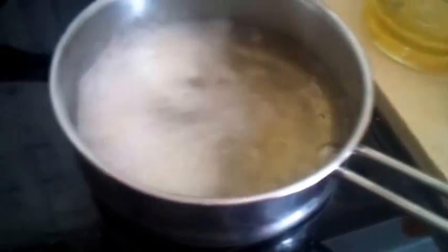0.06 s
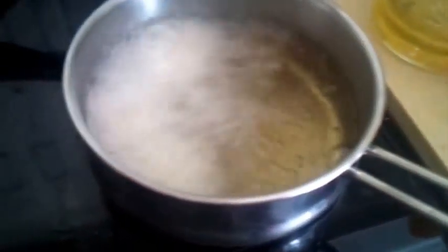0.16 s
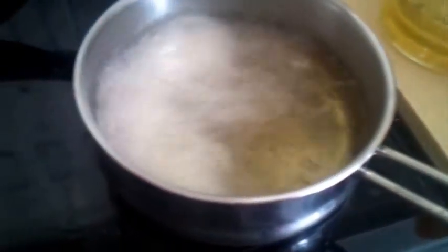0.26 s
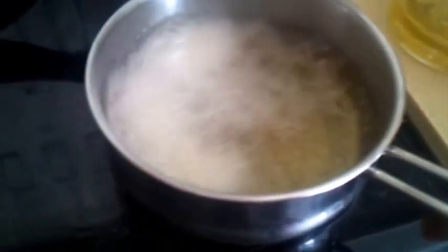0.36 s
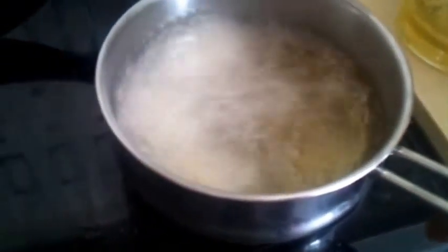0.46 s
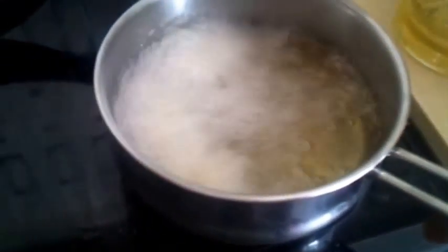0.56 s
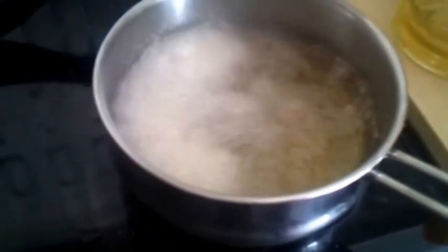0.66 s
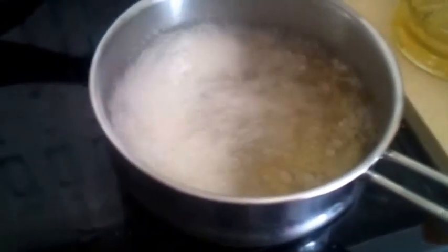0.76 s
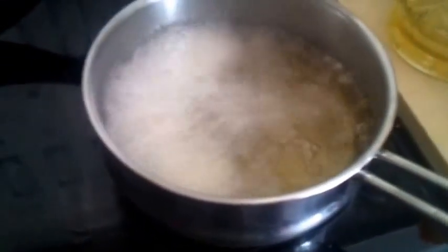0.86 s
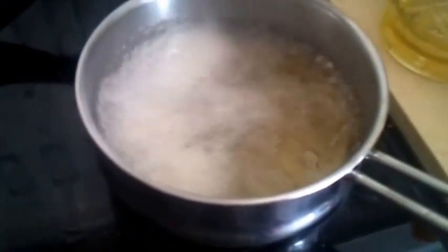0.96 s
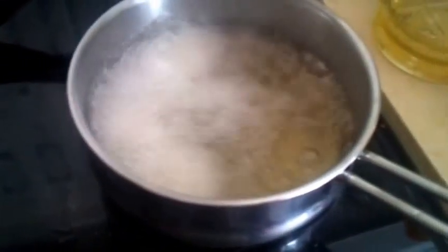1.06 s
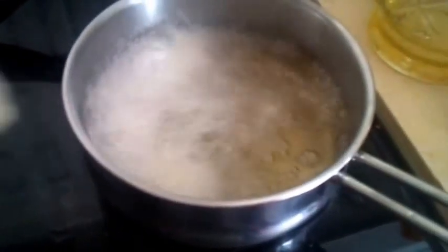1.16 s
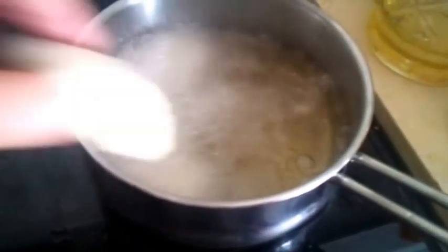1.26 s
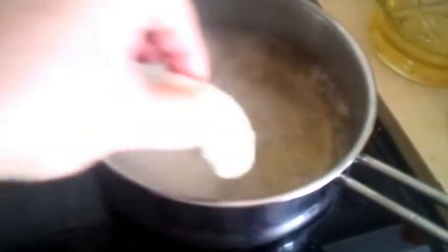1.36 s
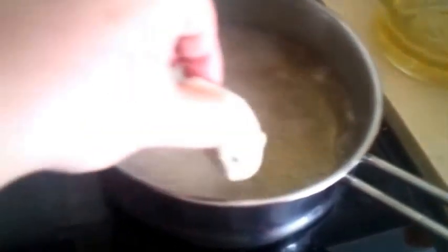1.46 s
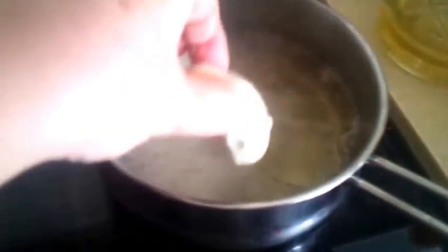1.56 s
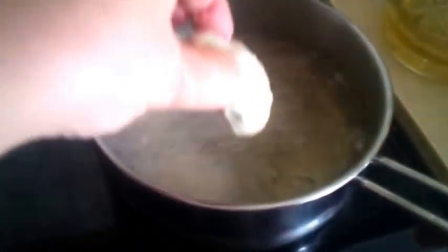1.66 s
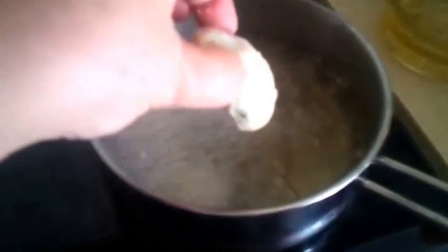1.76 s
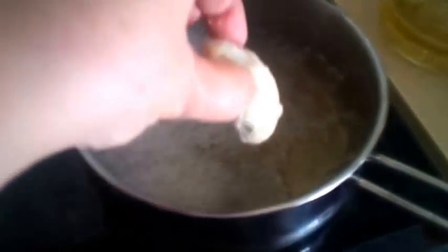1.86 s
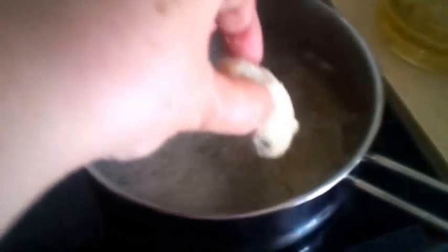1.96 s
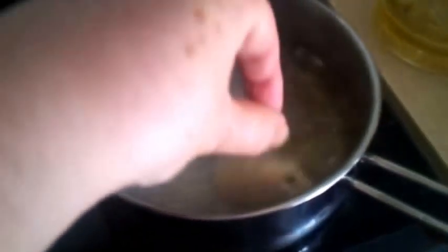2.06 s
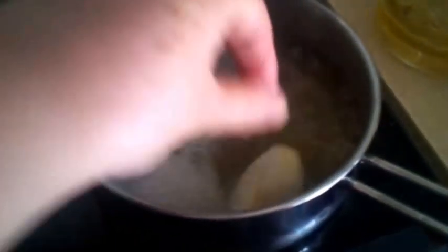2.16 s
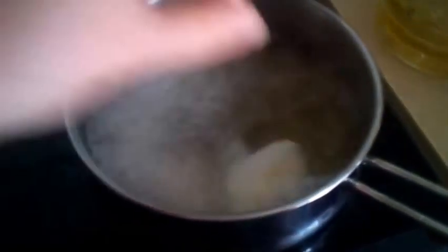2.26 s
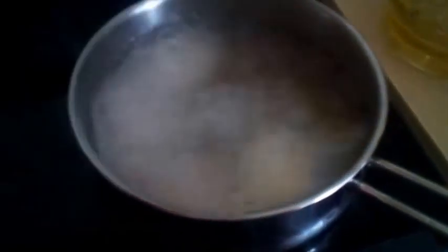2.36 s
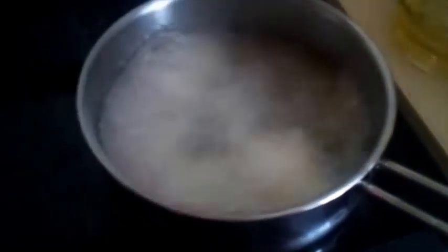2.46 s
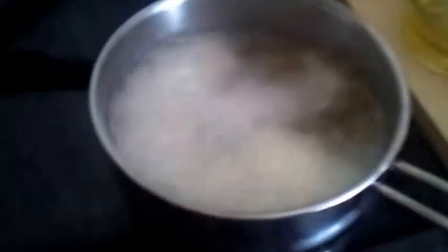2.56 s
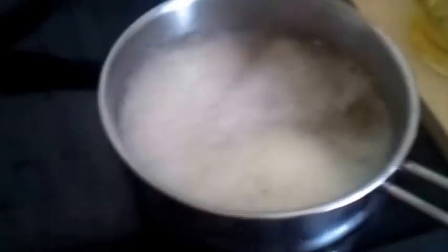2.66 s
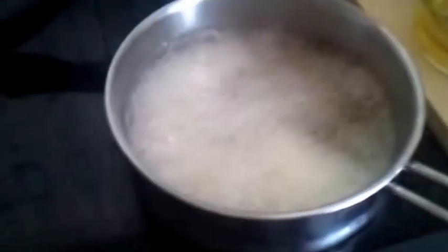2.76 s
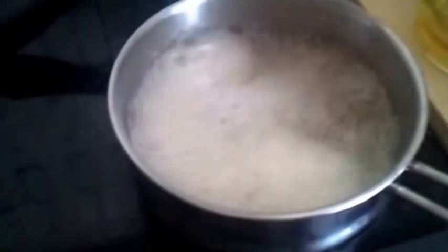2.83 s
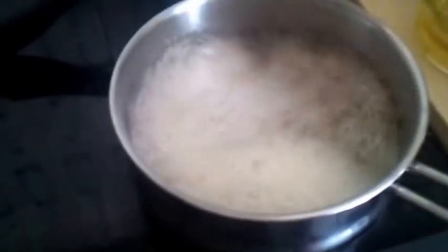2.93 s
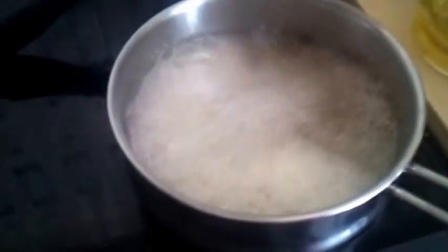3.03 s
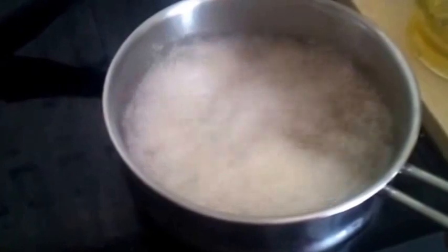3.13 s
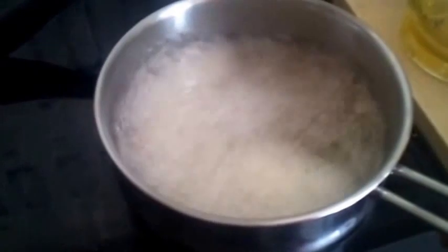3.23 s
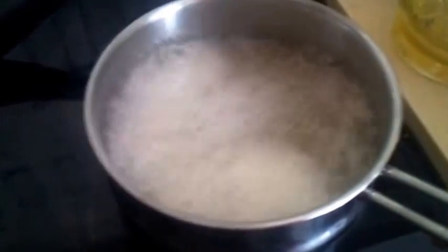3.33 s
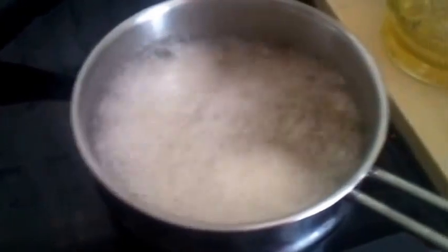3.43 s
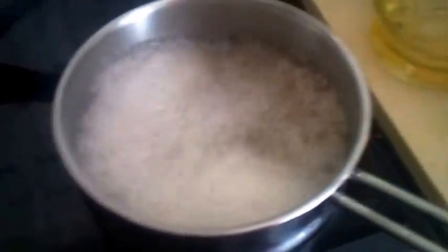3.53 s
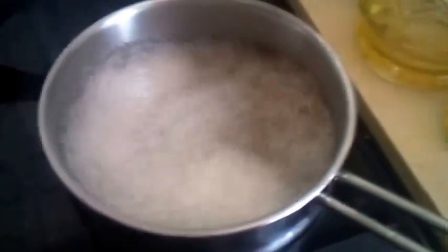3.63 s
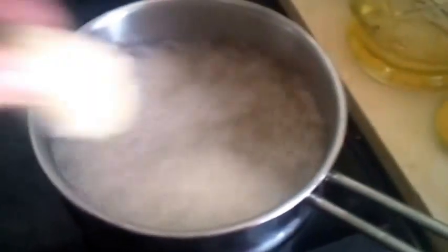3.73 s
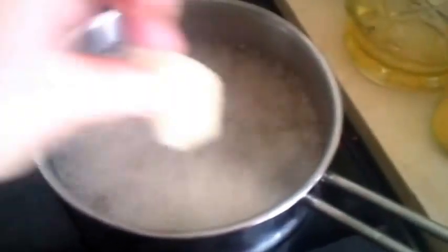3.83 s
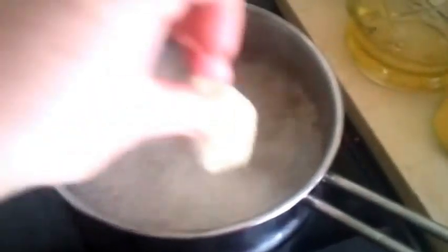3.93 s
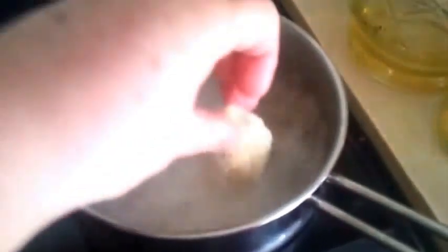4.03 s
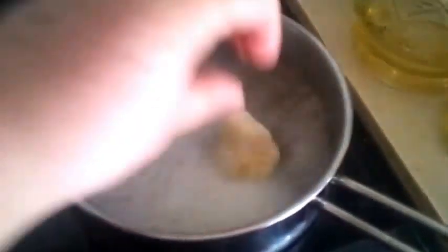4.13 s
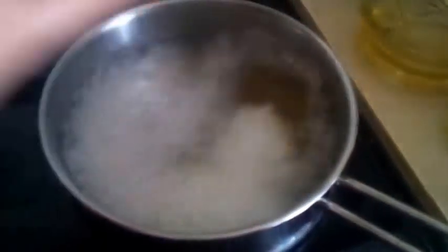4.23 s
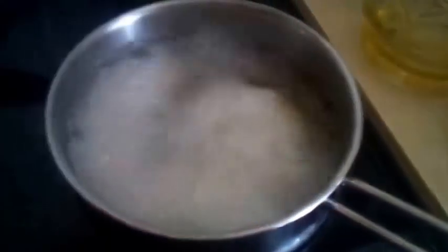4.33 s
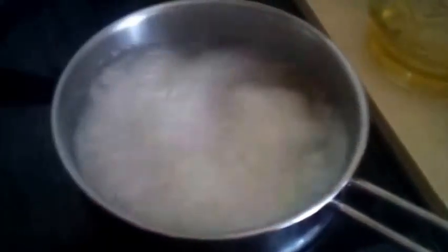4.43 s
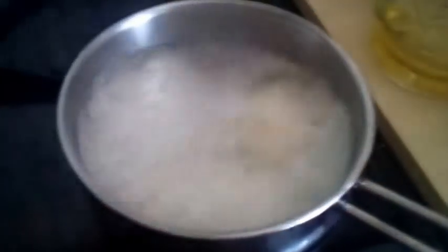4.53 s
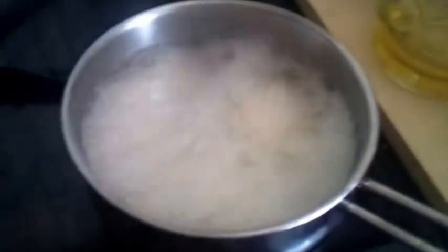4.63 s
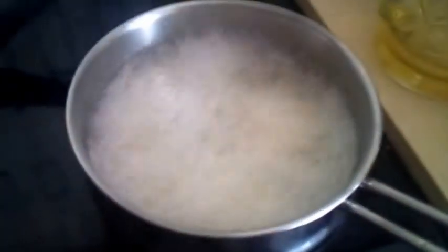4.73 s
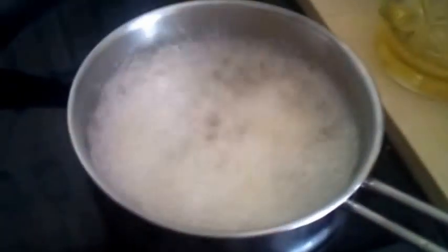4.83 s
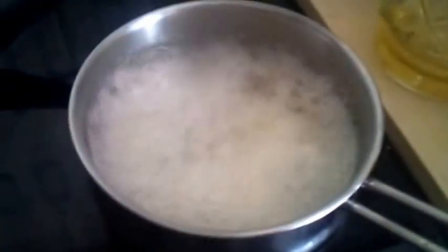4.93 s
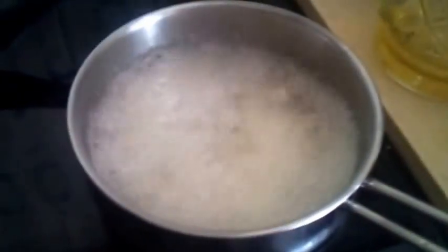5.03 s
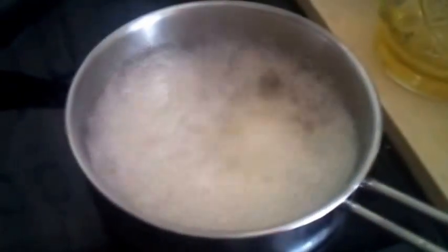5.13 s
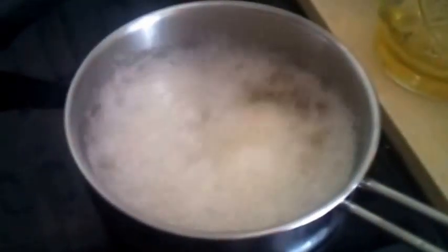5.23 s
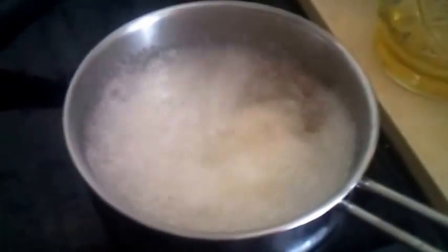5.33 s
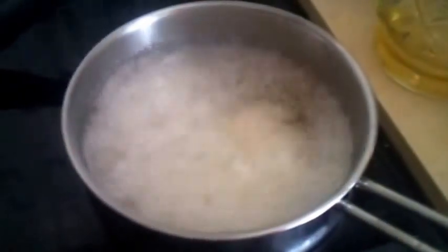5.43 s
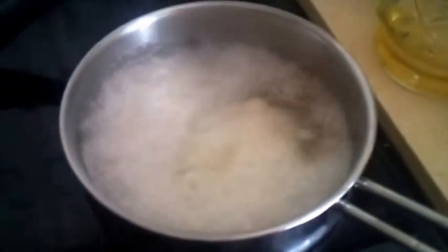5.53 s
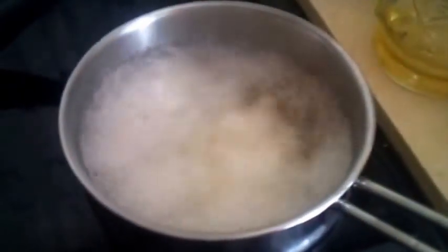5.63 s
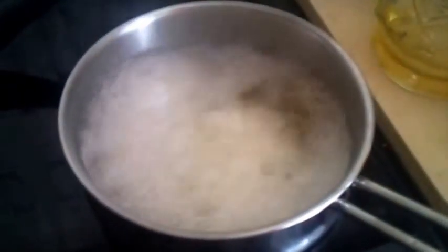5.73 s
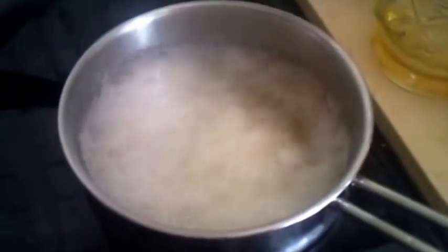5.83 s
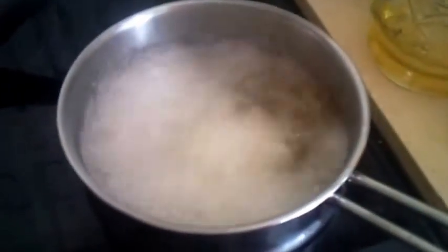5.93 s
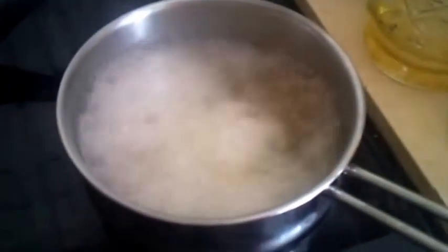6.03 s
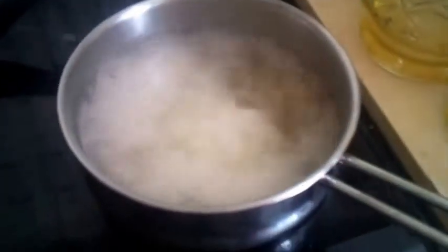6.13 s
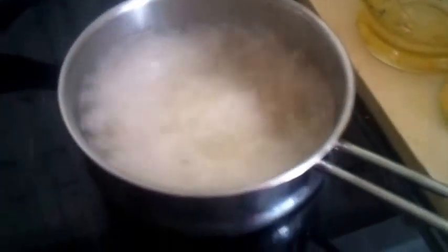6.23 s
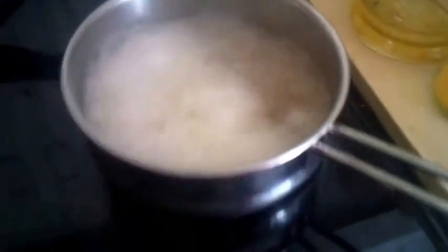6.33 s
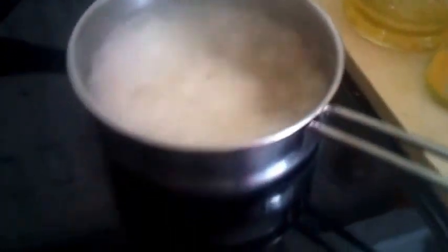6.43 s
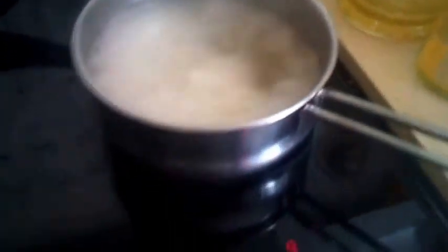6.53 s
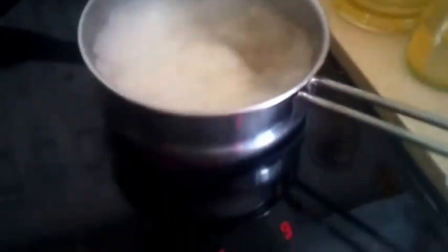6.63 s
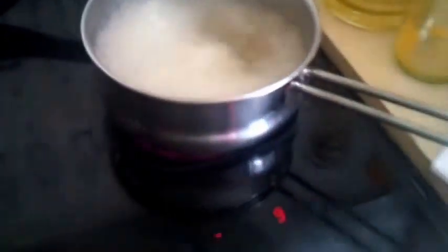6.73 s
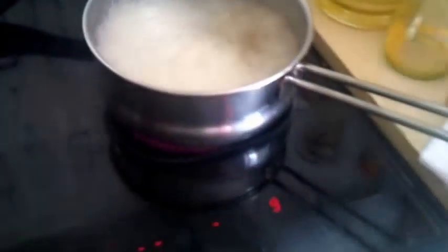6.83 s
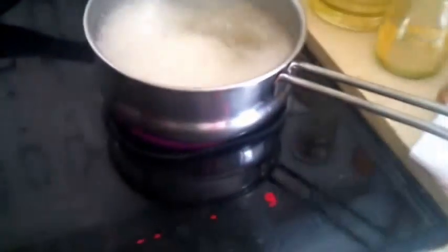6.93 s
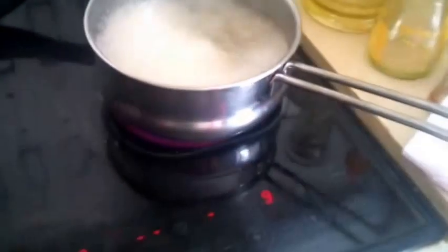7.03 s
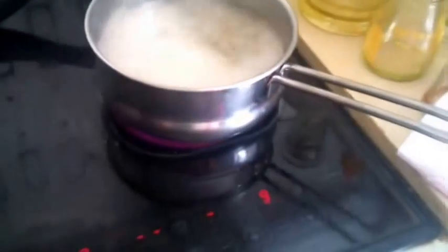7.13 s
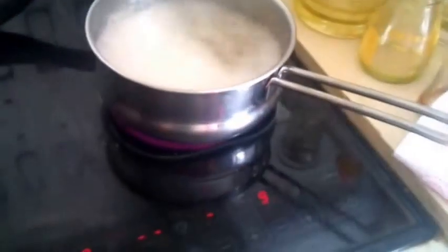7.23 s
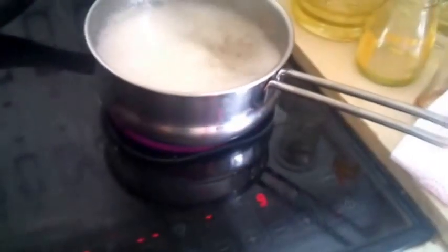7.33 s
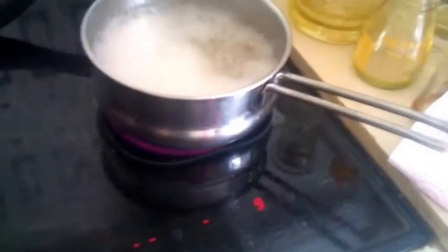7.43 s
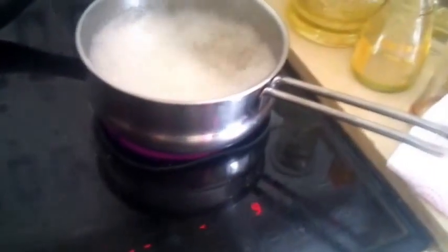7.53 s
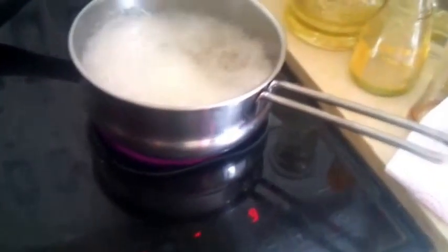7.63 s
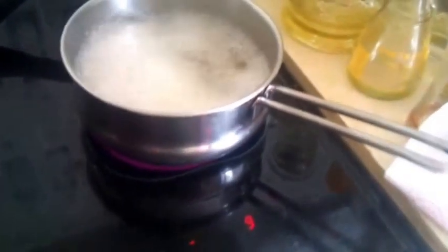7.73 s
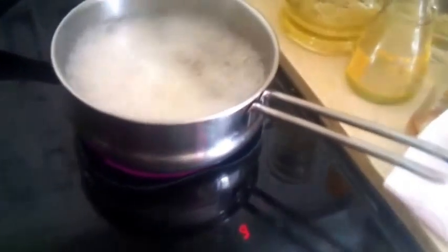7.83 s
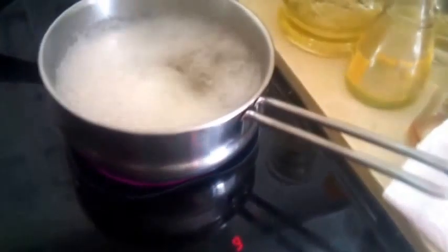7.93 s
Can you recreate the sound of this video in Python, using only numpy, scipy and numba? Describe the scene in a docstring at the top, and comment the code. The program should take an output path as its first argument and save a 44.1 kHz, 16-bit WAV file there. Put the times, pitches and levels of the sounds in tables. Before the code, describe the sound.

Hot oil simmers with sparse crackles and pops, two croquettes plop in with hissing flashes, then a loud rolling boil swells and slowly eases.

```python
"""Croquettes frying in a saucepan

Frozen croquettes fry in a small steel pan; two more slide in near 2.3 s and 4.3 s, each with a flash of hiss.
The second brings a rolling boil that swells and subsides, made of random clicks and short ringing bubbles.
Larger bubbles pop, droplets spit, and at two moments steam whistles from a crust as gliding sine tones.
The pan and kitchen echo this over a cooker's fan noise and hum. A limiter ducks everything around loud pops."""
import sys
import numpy as np
from scipy import signal
from scipy.fft import rfft, irfft
from scipy.io import wavfile
from scipy.ndimage import uniform_filter1d, minimum_filter1d
from numba import njit

SR = 44100
rng = np.random.default_rng(int(sys.argv[2]) if len(sys.argv) > 2 else 0)


def file_out(sig):
    """Save sig as 16-bit WAV at sys.argv[1]."""
    # one column per channel
    cols = np.atleast_2d(sig).T
    # limit, then scale
    lim = np.clip(cols, -1, 1)
    pcm = np.round(lim * 32767).astype(np.int16)
    wavfile.write(sys.argv[1], SR, pcm)


N = 351918
TIME = np.arange(N) / SR  # seconds

# The second croquette turns the simmer into a rolling boil.
ROLLING_FROM_S, ROLLING_TAKES_S = 4.4, 0.48
# The microphone backs away from the pan.
BACK_OFF_S, BACK_OFF_TAKES_S = 6.56, 0.46


def undb(db):
    """Turn decibels into a gain."""
    return 10 ** (np.asarray(db) / 20)


def unit(x):
    """Scale to an rms level of 1."""
    return x / np.sqrt(np.mean(x ** 2))


def curves(table):
    """Join each column of a table by straight lines in time."""
    s, *columns = np.transpose(table)
    return [np.interp(TIME, s, column) for column in columns]


def ramp(start_s, takes_s):
    """A straight rise from 0 to 1."""
    return np.clip((TIME - start_s) / takes_s, 0, 1)


def walk(rate):
    """Smooth random wandering with an rms of 1, heading for a new value rate times a second."""
    hold = int(SR / rate)
    steps = np.repeat(rng.standard_normal(N // hold + 1), hold)
    return unit(uniform_filter1d(steps, hold)[:N])


def convolve(x, response):
    """Pass a sound through an impulse response."""
    return signal.fftconvolve(x, response)[:N]


def colour(x, points, size=8192):
    """Causal filter through (Hz, dB) points, falling steeply beyond both ends."""
    hz, db = np.transpose(points)
    octave = np.log2(np.maximum(np.fft.rfftfreq(size, 1 / SR), 1))
    beyond = np.abs(octave - np.clip(octave, np.log2(hz[0]), np.log2(hz[-1])))
    level_db = np.interp(octave, np.log2(hz), db) - np.minimum(30 * beyond, 60)
    # folding the cepstrum puts the filter's response after each sound, never before it
    cepstrum = irfft(np.log(undb(level_db)))
    cepstrum[1:size // 2] *= 2
    cepstrum[size // 2 + 1:] = 0
    return convolve(x, irfft(np.exp(rfft(cepstrum))))


def impulses(s, size):
    """One sharp push of the given size at each time."""
    out = np.zeros(N)
    out[np.clip((s * SR).astype(int), 0, N - 1)] = size
    return out


@njit
def bubbles(start, hz, cycles, size, glide):
    """Each bubble swells within a cycle, rings for a few more and drifts up in pitch by the fraction glide."""
    out = np.zeros(N)
    for k in range(len(start)):
        first, step = int(start[k] * SR), hz[k] / SR
        length = int(5 * cycles[k] / step)
        z = size[k] + 0j
        turn = np.exp(2j * np.pi * step - step / cycles[k])  # one sample of ringing and decay
        bend = np.exp(2j * np.pi * step * glide / length)
        closed, opening = 1., np.exp(-1.3 * step)
        for i in range(max(first, 0), min(first + length, N)):
            out[i] += z.imag * (1 - closed)
            z, turn, closed = z * turn, turn * bend, closed * opening
    return out


def swarm(rate, low_hz, high_hz, cycles, spread_db, count=24000):
    """Bubbles of random size and pitch at a given rate per second, with steady mean power."""
    chance = rng.random((count, 4))
    due = np.cumsum(-np.log(1 - chance[:, 0]))  # random gaps, counted in bubbles
    born = np.cumsum(rate * np.ones(N)) / SR
    kept = due < born[-1]
    chance, start = chance[kept], np.interp(due[kept], born, TIME)
    lowest = np.interp(start, TIME, low_hz * np.ones(N))
    hz = lowest + (high_hz - lowest) * chance[:, 1]
    size = undb(-spread_db * np.log(0.019 + chance[:, 2])) * np.sqrt(hz)
    return bubbles(start, hz, cycles * (.5 + chance[:, 3]), size, 0.14) / np.sqrt(rate)


def clicks(rate, spread_db):
    """Droplets flashing to steam: very many small clicks and a few big ones."""
    fired = rng.random(N) < rate / SR
    return fired * rng.choice([-1, 1], N) * undb(-spread_db * np.log(0.0074 + rng.random(N)))


# How hard the oil boils.
# Each row: time in seconds, vigour from 0 (simmer) to about 1 (foaming right up).
VIGOUR = [(4.6, 0.0055), (4.75, 0.18), (4.92, .32), (5.12, 0.41), (5.3, .62), (5.55, 0.84), (5.78, 0.79),
          (6.02, 0.98), (6.3, 1.014), (6.55, .94), (6.9, 0.92), (7.08, 0.72), (7.3, 0.6), (7.6, 0.45),
          (7.98, 0.33)]


def vigour(s):
    """How hard the oil boils at the given times."""
    return np.maximum(np.interp(s, *np.transpose(VIGOUR), left=0), 0)


def follow(law, s):
    """A level in dB that rises with the vigour of the boil: simmer + rise * vigour ** bend."""
    simmer_db, rise_db, bend = law
    return simmer_db + rise_db * vigour(s) ** bend


# Croquettes slide in and their frost flashes to steam.
# Each row: start in seconds, strength as a plain factor.
CROQUETTES = [(2.25, 1.04), (4.26, 0.9)]


def plunges(decay_s, attack_s=0.042):
    """Each croquette's entry as a control curve: a quick rise, then a decay."""
    out = np.zeros(N)
    for s, strength in CROQUETTES:
        fall = np.exp(-np.maximum(TIME - s - attack_s, 0) / decay_s)
        out += strength * ramp(s, attack_s) * fall
    return out


# How large the boiling bubbles get.
# Each row: time in seconds, pitch of the largest bubble in Hz.
LARGEST_BUBBLE = [(4.7, 1370), (5.0, 1080), (5.5, 967.3), (6.2, 1025), (6.8, 1296), (7.3, 1550),
                  (7.98, 1696)]


def largest_bubble():
    """The pitch in Hz of the largest boiling bubble; larger bubbles ring lower."""
    hz, = curves(LARGEST_BUBBLE)
    return hz


# Tone of the fan's rush. Each row: frequency in Hz, relative level in dB.
FAN_COLOUR = [(15, -10), (25, -11.5), (64, -8), (86, -6.5), (102, -1), (146, -9), (216, -2.5), (258, -9),
              (289, -16), (323, -11), (405, -17.5), (692, -12), (926, -29), (1110, -13), (1200, -16.5),
              (1560, -30), (2640, -120)]
# Mains hum of the cooker. Each row: average pitch in Hz, rms level in dB.
HUM = [(100, -36), (208, -42.5)]


def cooker(fan_db, waver):
    """A fan's low rush is coloured noise; the hum is a pair of sines whose pitch wavers."""
    fan = unit(colour(rng.standard_normal(N), FAN_COLOUR)) * undb(fan_db + walk(7.5))
    hum = np.zeros(N)
    for hz, db in HUM:
        phase = 2 * np.pi * np.cumsum(hz * (1 + waver * walk(15))) / SR
        hum += undb(db) * np.sqrt(2) * np.sin(phase)
    return fan + hum


# Tone of the bubbles at a simmer. Each row: frequency in Hz, relative level in dB.
SIMMER_COLOUR = [(900, -24.5), (1150, -9.5), (1400, -7.5), (1900, -1.5), (2400, -3.5), (2900, -1),
                 (3500, -13.5), (4200, -18)]
# Tone of the bubbles in the rolling boil. Each row: frequency in Hz, relative level in dB.
BOIL_COLOUR = [(600, -24), (900, -14.5), (1100, -3), (1400, -8.5), (1700, -2.5), (2000, -5.5), (2500, -4),
               (3000, -5.5), (3500, -14), (4300, -15.5), (6000, -18)]
# How the bubbling follows the vigour: level in dB at a simmer, rise in dB, bend of the curve.
BOIL_LAW = (-23.5, 28.1, 0.64)


def bubbling(flash, splash, swell, surge, clusters):
    """Steam bubbles ring in the oil; the harder it boils, the more there are, and their largest pitch varies."""
    rolling = ramp(ROLLING_FROM_S, ROLLING_TAKES_S)
    bubbles_per_s = 300 + 1800 * vigour(TIME)
    simmer = swarm(1800, 955, 3900, cycles=1.0, spread_db=-1.5)
    simmer = unit(colour(simmer, SIMMER_COLOUR)) * undb(-2.34)
    boil = swarm(bubbles_per_s, largest_bubble(), 3970, cycles=1.52, spread_db=2.5)
    boil = unit(colour(boil, BOIL_COLOUR))
    mixed = simmer * np.sqrt(1 - rolling) + boil * np.sqrt(rolling)
    level_db = follow(BOIL_LAW, TIME) + 3 * flash + 2 * splash + 0.7 * swell
    return mixed * undb(level_db + 0.7 * surge + 2.77 * clusters)


# Tone of the crackle. Each row: frequency in Hz, relative level in dB.
CRACKLE_COLOUR = [(1500, -14), (3000, -1.5), (4200, -1.5), (5200, -1), (6500, -5.5), (8000, -18),
                  (11000, -20.5)]
# How the crackle follows the vigour: level in dB at a simmer, rise in dB, bend of the curve.
CRACKLE_LAW = (-34, 27.3, 1.08)


def crackling(flash, swell, surge, clusters):
    """Water bursts from the crusts as fine clicks and short high pings."""
    crackle = unit(colour(clicks(4500, spread_db=2.0), CRACKLE_COLOUR))
    pings = unit(colour(swarm(450, 3300, 9000, cycles=4, spread_db=5.5), CRACKLE_COLOUR))
    pings = pings * (1 - ramp(ROLLING_FROM_S, ROLLING_TAKES_S) / 2)  # foam smothers them
    level_db = follow(CRACKLE_LAW, TIME) + 5.5 * flash + 0.6 * swell
    return (crackle + pings * undb(0.5)) * undb(level_db + 2.8 * surge + 0.85 * clusters)


# Tone of the spray. Each row: frequency in Hz, relative level in dB.
SPRAY_COLOUR = [(5000, 6), (8000, -4.5), (10000, -8), (12000, -14), (14000, -15)]
# How the spray follows the vigour: level in dB at a simmer, rise in dB, bend of the curve.
SPRAY_LAW = (-51, 35.5, 1.65)


def spraying(flash, swell, surge, clusters):
    """The finest droplets hiss as clicks and the tiniest bubbles fizz."""
    spray = unit(colour(clicks(5900, spread_db=6), SPRAY_COLOUR))
    fizz = unit(colour(swarm(900, 6450, 14900, cycles=6.8, spread_db=3.5), SPRAY_COLOUR))
    # as the microphone backs away, the rim of the pan hides the spray
    rim_shade_db = -9 * ramp(BACK_OFF_S, BACK_OFF_TAKES_S)
    level_db = follow(SPRAY_LAW, TIME) + 14 * flash + rim_shade_db + 1.8 * swell
    return (spray * undb(7.5) + fizz * undb(4.5)) * undb(level_db + 3.1 * surge + 2.9 * clusters)


# Tone of the gurgle. Each row: frequency in Hz, relative level in dB.
GURGLE_COLOUR = [(110, -17), (280, -10.5), (450, -1), (730, 1.5), (1000, -1.5), (1400, -19)]
# How the gurgle follows the vigour: level in dB at a simmer, rise in dB, bend of the curve.
GURGLE_LAW = (-37.5, 29.15, 0.86)


def gurgling(flash, splash, swell, clusters):
    """Big slow bubbles ring low, and lower still when the boiling bubbles are large."""
    deepest_hz = 225 * (largest_bubble() / 1000) ** 1.61
    gurgle = unit(colour(swarm(600, deepest_hz, 1277, cycles=1.23, spread_db=3.5), GURGLE_COLOUR))
    level_db = follow(GURGLE_LAW, TIME) + 1 * flash + 8.5 * splash + 1.1 * swell
    return gurgle * undb(level_db + 1.7 * clusters)


def oil():
    """Bubbles, crackle, spray and gurgle share heaves, clusters and flashes; all but the gurgle also spurt."""
    flash = plunges(decay_s=0.53)  # frost turns to steam
    splash = plunges(decay_s=.07)  # the oil closes quickly over each croquette: bubbles and gurgle only
    swell = walk(7)  # the whole pan heaves slowly
    surge = walk(35)  # steam comes in spurts
    # in a rolling boil the foam collapses in clusters
    clusters = ramp(ROLLING_FROM_S, ROLLING_TAKES_S) * walk(130)
    body = bubbling(flash, splash, swell, surge, clusters) + gurgling(flash, splash, swell, clusters)
    crust = crackling(flash, swell, surge, clusters)
    return body + crust + spraying(flash, swell, surge, clusters)


# How the rumble follows the vigour: level in dB at a simmer, rise in dB, bend of the curve.
RUMBLE_LAW = (-41.5, 23.8, 1.9)


def rumble():
    """The body of oil churns as very low bubbles, strongest at the height of the boil."""
    fade_db = -20 * ramp(BACK_OFF_S, BACK_OFF_TAKES_S)  # it is no longer close to the microphone
    churn = unit(swarm(250, 71, 616, cycles=1.2, spread_db=3.0))
    return churn * undb(follow(RUMBLE_LAW, TIME) + fade_db)


def arrivals(rate, count=600):
    """Uneven moments at a given rate, each with two random numbers from 0 to 1."""
    chance = rng.random((count, 3))
    due = np.cumsum(.3 + 1.4 * chance[:, 0])  # never too close: a bubble needs time to grow
    born = np.cumsum(rate) / SR
    kept = due < born[-1]
    return np.interp(due[kept], born, TIME), chance[kept, 1], chance[kept, 2]


# How the small pops follow the vigour: relative level in dB at a simmer, rise in dB, bend of the curve.
SMALL_POP_LAW = (-19.5, 22.3, 0.2)


def small_pops():
    """Lesser random bursts; in the rolling boil they are more frequent, louder, lower and muffled by foam."""
    rolling = ramp(ROLLING_FROM_S, ROLLING_TAKES_S)
    s, strength, width = arrivals(5 + 26 * rolling)
    foam = np.interp(s, TIME, rolling)
    db = follow(SMALL_POP_LAW, s) + 11.5 * (strength - .5)
    octaves_down = 0.602 * foam + .75 * (width - .5)
    hz = 3380 * 2 ** -octaves_down
    crack_db = 2 - 18.5 * foam  # crack relative to ring
    return np.column_stack([s, db, hz, crack_db])


# The sharpest droplets spitting at the surface. Each row: start in seconds, relative level in dB.
SPITS = [(0.0992, -10), (3.6182, -4), (4.5875, -6.5), (4.7821, 2), (5.3069, 0), (5.4491, 1), (5.5004, 7.5),
         (5.6825, 2), (5.7083, 9.5), (7.1182, -5)]
# How the small spits follow the vigour: relative level in dB at a simmer, rise in dB, bend of the curve.
SMALL_SPIT_LAW = (-28.5, 4.5, 0.75)


def spits(burst_s, gain_db):
    """Water flashes to steam in sharp ticks: a few big ones, and a lesser one with each small burst."""
    s, db = np.transpose(SPITS)
    luck_db = -6 * np.log(0.032 + rng.random(len(burst_s)))  # most stay faint
    small_db = follow(SMALL_SPIT_LAW, burst_s) + luck_db
    ticks = impulses(s, undb(db)) + impulses(burst_s, undb(small_db))
    return undb(gain_db) * colour(ticks, [(1500, -8), (3000, -1), (6000, 15.5), (9000, 5), (14000, -9)])


# The loudest steam bubbles bursting.
# Each row: start in seconds, relative level in dB, starting pitch in Hz, crack relative to ring in dB.
BIG_POPS = [(0.2566, -14, 2340, 5), (0.2817, -21, 2530, 10), (0.2937, -6, 4300, 7),
            (0.329, -13.5, 2140, -1), (0.4147, -13.5, 4100, 3), (0.4965, 0.5, 4070, 3),
            (0.572, 6.5, 2930, -13), (0.6845, 0.5, 4010, -9), (0.8929, -13, 4730, -4),
            (0.9101, -2, 4900, -3), (0.9737, 3, 3350, -28), (1.15, -12.5, 3380, 2), (1.186, -6, 3660, -9),
            (1.2327, -1.5, 2620, -29), (1.461, -19, 5630, -18), (1.5354, 1.5, 2760, -4),
            (1.634, -15.5, 5580, -20), (1.8972, -5.5, 2800, -3), (2.0271, -4, 5160, -2),
            (2.3029, -9.5, 1880, -6), (2.3405, -11, 1810, -3), (2.4674, 2.5, 2390, -9),
            (2.531, -8.5, 2800, 6), (2.5861, -8.5, 4040, 0), (2.6353, -4.5, 3310, -5),
            (2.8294, -11, 2030, 0), (2.8574, -4, 1860, -5), (2.8967, -8, 2900, -4), (2.944, -3.5, 2890, 12),
            (2.9844, -10, 2930, 14), (3.0261, 6, 3270, -6), (3.086, 7.5, 2800, -10), (3.113, -7, 2900, -1),
            (3.1726, 3, 1850, -8.5), (3.191, 6, 2390, -16.5), (3.2463, -8, 3280, -23),
            (3.296, 8, 1890, -7.5), (3.3682, -10, 1970, -15), (3.4472, -8.5, 4130, -3),
            (3.5188, 0, 3550, -8), (3.5415, -6.5, 2640, -25), (3.6186, 9.5, 2330, -8.5),
            (3.741, -8.5, 3510, -3), (3.8591, 5.5, 2860, -21), (4.0397, -13, 2020, -1),
            (4.116, -13, 4500, -4), (4.1338, -9.5, 2800, -13), (4.368, -10.5, 4400, 4),
            (4.5272, -7, 1620, 5), (4.6967, 2, 2320, 1), (4.7255, 3, 2330, -7), (4.739, 10, 1990, -11),
            (4.7828, 8.5, 2290, -10), (4.8388, 5, 2490, -10), (4.883, 13, 1730, -9),
            (4.9308, 13, 2070, -17), (4.9501, 8, 1920, -4), (4.996, 10, 1400, -16), (5.076, 7.5, 2230, -2),
            (5.1611, 9.5, 1640, -2), (5.2353, 6.5, 2500, -9), (5.273, 5, 1140, -13),
            (5.474, 8.5, 1419, -11), (5.589, 18, 1621, -22), (5.837, 8, 1102, -20), (5.896, 11.5, 1854, -5),
            (6.595, 16, 699, -6.5), (6.892, 14.5, 750.6, -7), (6.964, 9, 734, -22), (7.1583, 11, 2385, 0),
            (7.2545, 15, 790, -11), (7.3052, 9.5, 2500, -12), (7.332, 10.5, 1587, -25),
            (7.344, 4, 790, -20), (7.394, 8, 1880, -18), (7.4734, 11, 711, -20), (7.539, 8, 2374, -16),
            (7.5994, 9, 880.5, -22), (7.6299, 11, 2437, -26), (7.7256, 9, 1643, -24),
            (7.7705, 10.5, 2080, -21), (7.774, 8, 978, -21), (7.922, 9, 2668, -11)]


def pops(lesser, ring_db, crack_db, cycles, crack_s, foam_db, foam_s, detune, count=5):
    """A bubble's skin tears with a crack, its cavity rings, and the foam beside it collapses just after."""
    s, db, hz, tear_db = np.vstack([BIG_POPS, lesser]).T
    size = undb(db) / np.sqrt(1 + undb(2 * tear_db))  # share the power between ring and crack
    turns = cycles * (hz / 2500) ** 0.59  # wide cavities collapse within a cycle or two
    ring_size = size * (hz / 2500) ** 0.56
    rings = bubbles(s, hz, turns, ring_size, 0.058)
    for late, pitch in rng.random((len(s), 2, count)).T:
        foam_size = ring_size * undb(foam_db - 10 * late)
        foam_hz = hz * np.exp(detune * (2 * pitch - 1))
        rings = rings + bubbles(s + .0007 + foam_s * late, foam_hz, turns, foam_size, 0.048)
    fade = np.exp(-TIME[:SR // 20] / crack_s)
    cracks = convolve(impulses(s, size * undb(tear_db)), fade) * rng.standard_normal(N)
    cracks = colour(cracks, [(400, -11.5), (1200, -16.5), (2300, 4.5), (4000, 0), (6500, -4.5),
                             (9000, -22.0), (14000, -36.0)])
    return undb(ring_db) * rings + undb(crack_db) * cracks


# Steam squeezing out of a crust, one list of rows for each jet.
# Each row: time in seconds, pitch in Hz before wavering, relative level in dB.
STEAM_JETS = [
    [(.868, 6300, -21), (.885, 5700, -62), (.90, 5600, -42)],
    [(.895, 5050, -38), (.915, 5000, -16), (.94, 4850, -26), (.96, 4800, -23), (.975, 4600, -34)],
    [(3.695, 3640, -77), (3.72, 3900, -32), (3.765, 3970, -25), (3.80, 4130, -17.5), (3.82, 4250, -16.5),
     (3.85, 4330, -38), (3.92, 4350, -48), (3.95, 4320, -51)],
    [(3.72, 6160, -44), (3.745, 6170, -33), (3.775, 5900, -30), (3.81, 5900, -42)],
    [(3.70, 4100, -26), (3.74, 4650, -36), (3.77, 4550, -75)],
]


def steam_jets(waver, overtone_db, flutter_db):
    """Steam whistles thinly: a gliding, unsteady sine with a weak octave."""
    out = np.zeros(N)
    for jet in STEAM_JETS:
        hz, db = curves(jet)
        phase = 2 * np.pi * np.cumsum(hz * (1 + waver * walk(1400))) / SR
        blowing = (TIME > jet[0][0]) & (TIME < jet[-1][0])
        tone = np.sin(phase) + undb(overtone_db) * np.sin(2 * phase)
        out += blowing * undb(db + 9.5 + flutter_db * walk(300)) * tone
    return out


# Dull plops as the croquettes land and settle.
# Each row: start in seconds, relative level in dB, base pitch in Hz.
PLOPS = [(2.299, -10, 280), (2.3, -9, 560), (2.343, -15, 1630), (3.378, -29, 1270), (3.391, -11.5, 1140),
         (3.426, -16.5, 1120), (4.375, -13, 626)]


def plops(gain_db, cycles):
    """The oil closes over a cavity that breaks into two nearly equal bubbles, then a slightly larger, lower one."""
    s, db, hz = np.transpose(PLOPS)
    turns = cycles * hz / 1000  # the widest cavities give a dull thud
    out = np.zeros(N)
    for late_s, ratio in [(0, 1.096), (.002, 1.09), (.006, 0.936)]:
        out += bubbles(s + late_s, hz * ratio, turns, undb(db + gain_db), 0.046)
    return out


# Air and wall resonances of the pan. Each row: pitch in Hz, width in Hz, level in dB.
PAN_MODES = [(726, 19, -1), (1423, 54, 2.5), (1604, 70, -10), (2347, 660, -5.5), (4310, 29, -4.5),
             (5260, 40, -22)]


def pan_and_kitchen(x, wall_db, wall_s, room_db, room_t60_s):
    """Direct sound, quick echoes between the pan walls, the pan's resonances and a faint room tail."""
    t = TIME[:SR // 2]
    walls = rng.standard_normal(len(t)) * np.exp(-t / wall_s) * (t > .0012)
    room = rng.standard_normal(len(t)) * undb(-60 * t / room_t60_s) * (t > .006)
    response = undb(wall_db) * walls / np.linalg.norm(walls) + undb(room_db) * room / np.linalg.norm(room)
    response[0] = 1  # direct sound
    for hz, width, db in PAN_MODES:
        ringing = np.exp(-np.pi * width * t) * np.cos(2 * np.pi * hz * t)
        response += undb(db) * 2 * np.pi * width / SR * ringing
    return convolve(x, response)


def scene():
    """The frying echoes in pan and kitchen; the cooker is added without echo."""
    sizzle = oil() + rumble()
    lesser = small_pops()
    ticks = spits(lesser[:, 0], gain_db=10.5)
    bursts = pops(lesser, ring_db=14, crack_db=12, cycles=2.56, crack_s=0.0021,
                  foam_db=-6.5, foam_s=.007, detune=0.19)
    whistles = steam_jets(waver=.028, overtone_db=-21.5, flutter_db=2.0)
    frying = sizzle + ticks + bursts + whistles + plops(gain_db=2.5, cycles=3.1)
    heard = pan_and_kitchen(frying, wall_db=-9.5, wall_s=0.0055, room_db=-13.5, room_t60_s=0.36)
    return (heard + cooker(fan_db=-28.0, waver=0.0181))[None]


@njit
def recover(cut, step):
    """The gain reduction follows each peak at once and then lets go gradually."""
    out, held = np.empty(len(cut)), 0.
    for i in range(len(cut)):
        held = max(cut[i], held * (1 - step))
        out[i] = held
    return out


def limiter(x, ceiling_db, release_s, memory, memory_s, size=256):
    """Look-ahead limiter: the gain dips just before a peak, and stays low while the peaks keep coming."""
    cut_db = np.maximum(20 * np.log10(np.abs(x) + 1e-9) - ceiling_db, 0)
    ahead_db = -minimum_filter1d(-cut_db, 2 * size, origin=-size + size // 2)
    quick_db = recover(ahead_db, 1 / (release_s * SR))
    step = 1 / (memory_s * SR)
    slow_db = memory * signal.lfilter([step], [1, step - 1], quick_db)
    return x * undb(-uniform_filter1d(np.maximum(quick_db, slow_db), size))


def record(dry):
    """The microphone's limiter holds the peaks, what is left of them is rounded, and the top is cut."""
    held = limiter(dry[0], ceiling_db=0.0, release_s=0.055, memory=0.8, memory_s=0.28)
    rounded = held / (1 + (held / .84) ** 6) ** (1 / 6)
    top_cut = signal.ellip(10, .2, 70, 14050, fs=SR, output="sos")  # steep low-pass at 14050 Hz
    return signal.sosfilt(top_cut, rounded)[None]


dry = scene()
out = record(dry)
file_out(out)
```